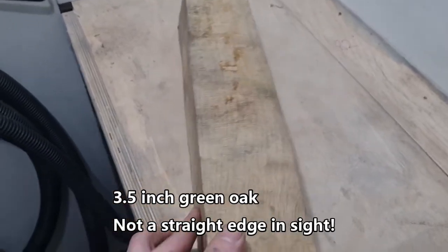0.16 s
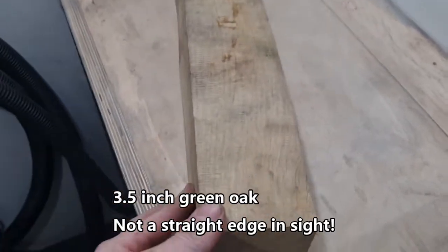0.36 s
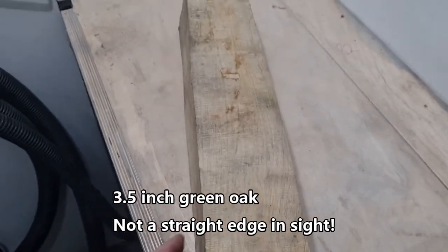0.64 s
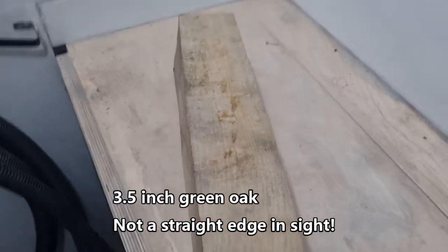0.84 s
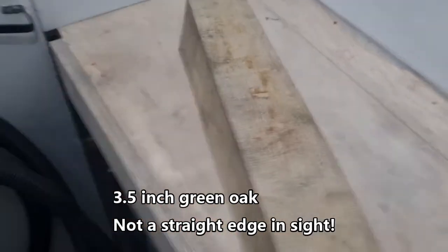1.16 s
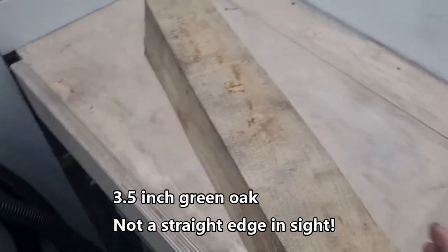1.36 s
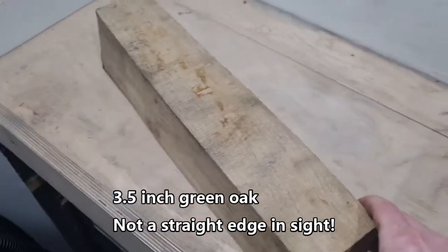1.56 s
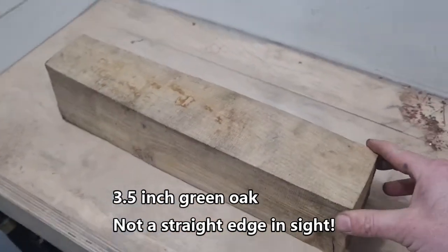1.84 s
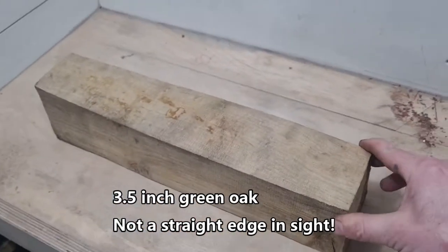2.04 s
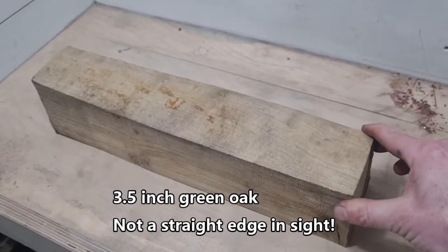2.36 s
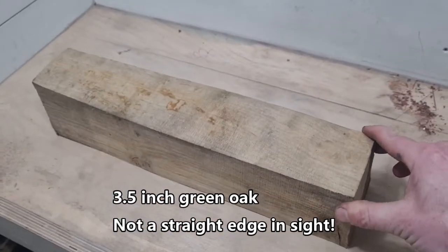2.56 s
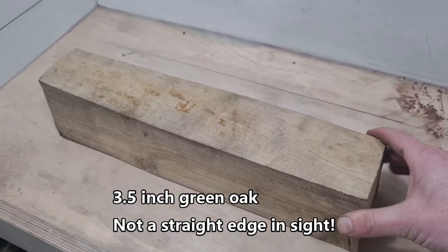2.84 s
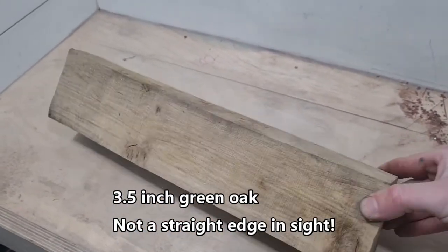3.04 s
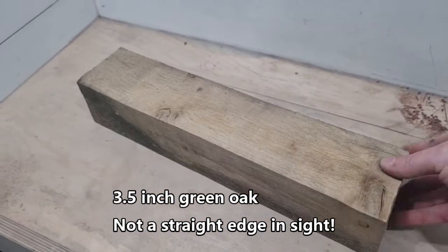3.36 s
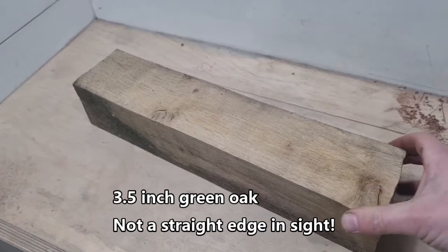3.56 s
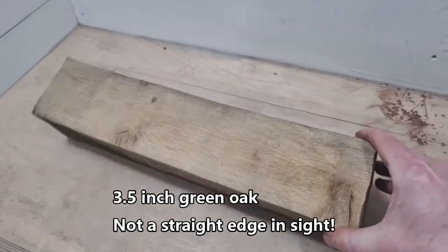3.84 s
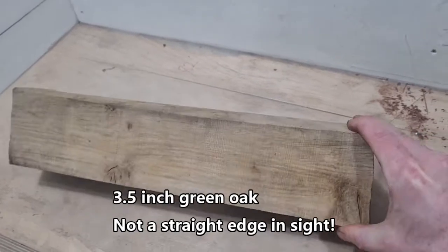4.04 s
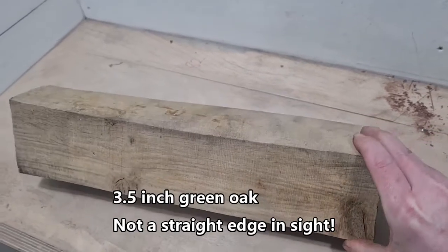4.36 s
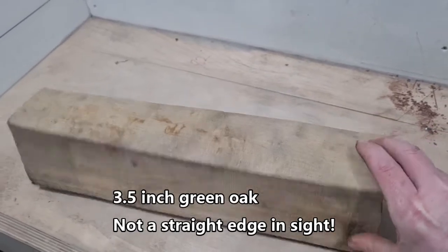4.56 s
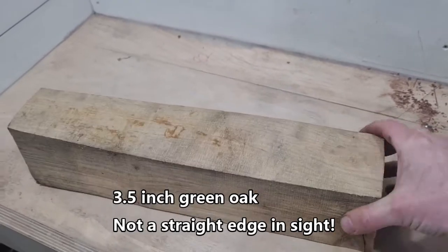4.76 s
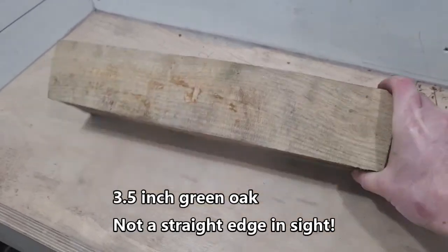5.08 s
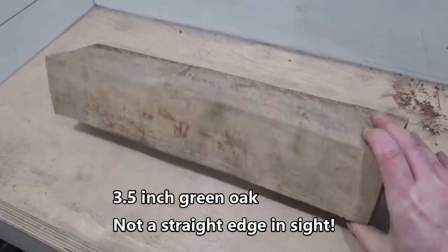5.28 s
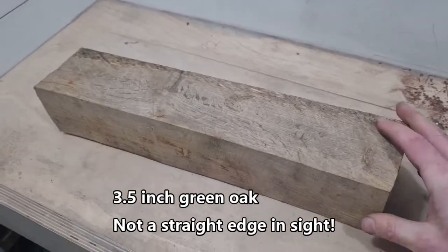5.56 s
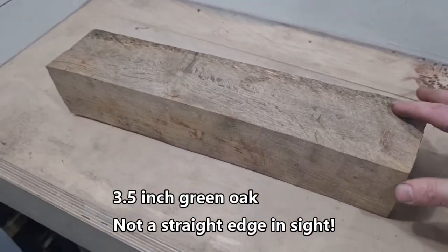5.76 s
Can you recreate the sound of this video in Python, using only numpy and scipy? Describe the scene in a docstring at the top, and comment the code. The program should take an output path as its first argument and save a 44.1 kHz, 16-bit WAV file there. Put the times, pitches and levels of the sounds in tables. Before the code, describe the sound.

A heavy, uneven oak block is handled on a plywood bench, heard close in stereo in a small workshop with low rumble and short reverberation. It opens with a dull, boomy thump and a much softer bump around 0.3 s. Near 0.9 s fingers make two tiny crisp ticks and a softer brush. A short rough slide rasps from 1.5 to 1.8 s. From 2.05 to 2.6 s the block rocks corner to corner in a quick clatter of hollow knocks, loud from 2.18 s. A juddering skid and duller knock come near 2.9 s, then a hard, booming slap at 3.27 s. A faint rub passes around 3.8 s. The strongest, sharpest drop lands at 4.55 s, followed by lesser knocks at 4.62 and 4.78 s. Dry, slightly singing scraping follows until about 5.1 s, then a solid double thump at 5.33 and 5.38 s fades into quiet.

```python
"""Oak block on a plywood workbench

A heavy block is slid, rocked and turned over by hand; its warped faces knock from corner to corner.
Each blow rings bench and block modes over a boom; slides are noise rubbed through the block's modes.
Short ticks, rough singing tones, room rumble and reverberation; the camera's limiter holds hard blows."""
import sys
import numpy as np
from scipy import signal
from scipy.fft import rfft, irfft, next_fast_len
from scipy.io import wavfile
from scipy.ndimage import uniform_filter1d, minimum_filter1d, map_coordinates

SR = 44100
rng = np.random.default_rng(int(sys.argv[2]) if len(sys.argv) > 2 else 0)


def inscribe(sig):
    """Save sig as 16-bit PCM at rate SR to the path in sys.argv[1].

    A 1-D sig is mono; a 2-D sig holds one channel per row.
    Samples are clipped to [-1, 1] before scaling.
    """
    pcm = np.round(np.clip(np.atleast_2d(sig).T, -1, 1) * 32767)
    wavfile.write(sys.argv[1], SR, pcm.astype(np.int16))


N = 260631

# Block meets bench: (time [s], landing spot, thud [dB], thud tilt [dB/octave], boom [dB], clack [dB],
# contact cut-off [Hz], favoured block resonance [Hz])
BLOWS = [(0.001, "flat", -17, -5, -6, -24, 690, 762), (0.317, "far", -25.5, -10, -32.5, -72, 290, 762),
         (0.383, "near", -57, -13, -43.5, -62, 285, 762), (2.05, "far", -14.5, 1, -15, -21.5, 430, 1558),
         (2.176, "near", -2.5, 0, -10, -14.5, 2300, 1310), (2.298, "far", -5, 0, -12, -23, 1600, 1390),
         (2.331, "near", -19, -3, -28.5, -36, 300, 762), (2.399, "near", -5, 2.5, -11, -16.5, 2222, 1277),
         (2.508, "far", -4, 1.5, -12.5, -20, 1600, 762), (2.539, "near", -11.5, -6, -24, -34.5, 300, 762),
         (2.597, "near", -3, 0, -9.5, -17, 2035, 762), (2.883, "far", -14, -3, -28.5, -31.5, 627, 762),
         (3.116, "flat", -31.5, -7.5, -21.5, -33.5, 1989, 1005),
         (3.182, "flat", -40, -3.5, -33, -48, 1800, 1551), (3.263, "flat", -31, 1, -37.5, -20, 1946, 1575),
         (3.272, "flat", -17, 4.5, 0, -6.5, 2593, 1344), (3.278, "flat", -1.5, 1, -23, -12, 1200, 1565),
         (3.29, "flat", -9.5, 1, -23, -22, 3000, 1607), (4.553, "flat", -3.5, 3, 2, -1.5, 2700, 762),
         (4.62, "far", -9.5, -3, -9.5, -26, 2255, 1675), (4.779, "near", -14, 0.5, -14, -19.5, 1400, 1020),
         (5.328, "flat", -5.5, 4, -4.5, -11, 2600, 1930), (5.377, "flat", -8.5, -2.5, -5.5, -15, 1750, 762)]
# Landing spots, in the order of the bench level columns: near corner, far corner, flat face
SPOTS = ["near", "far", "flat"]
# Plywood top modes: (frequency [Hz], t60 [s], level if hit by near corner, far corner, flat face [dB])
BENCH_MODES = [(97, 0.26, -7.5, -8.5, -7), (150.6, 0.21, -13, -14.5, -11.5), (171.3, 0.14, -4.5, -9, -5.5),
               (215, 0.14, -0.5, -5.5, 1), (269.5, 0.092, -9.5, 2, -6), (332, 0.12, -8, -10.5, 1),
               (370.1, 0.1, -5, -9.5, -3.5), (435, 0.079, -12, -5, -5.5), (513.3, 0.11, -15.5, -10.5, -5),
               (604, 0.1, -18, -10.5, -4), (672, 0.03, -27, -12.5, -14)]
# Oak block modes, damped by hand and bench: (frequency [Hz], level [dB], t60 [s])
BLOCK_MODES = [(762, 0, .11), (1005, -4, .08), (1065, -6, .08), (1180, -11, .07), (1300, -3, .08),
               (1440, -15, .08), (1565, -3, .11), (1675, -6, .11), (1767, -11, .09), (1850, -12, .09),
               (1930, -10, .09), (2050, -13, .09), (2250, -16, .09), (2430, -15, .08), (2900, -18, .09),
               (3080, -16, .085), (3300, -20, .07), (3480, -19, .06)]
# Dense ringing of block and bench: (frequency [Hz], density [dB per Hz])
CLACK_SPECTRUM = [(60, -48), (200, -2.5), (450, -6), (800, -5.5), (900, -12), (1100, -8.5), (1750, -16),
                  (2100, -13), (2650, -20.5), (3100, -14.5), (3550, -19.5), (4100, -23.5), (5400, -25.5),
                  (6500, -42.5), (15000, -64)]
# Decay of the dense ringing: (frequency [Hz], t60 [s])
CLACK_DAMPING = [(200, .14), (700, .11), (2000, .095), (3500, .075), (6000, .07), (14000, .06)]
# Pushes, or skids on an edge before a fall: (start [s], speeding up [s], slowing down [s], rasp [dB],
# judder [dB], hiss [dB], judder pitch [Hz])
SLIDES = [(-0.08, 0.16, 0.06, -43, -39.5, -51, 180), (1.497, 0.1, 0.19, -31, -30, -40.5, 180),
          (2.872, 0.12, 0.04, -26.5, -22, -45, 138), (3.246, 0.025, 0.011, -31, -30, -57, 180),
          (3.755, 0.12, 0.12, -40, -36, -69, 190), (4.508, 0.04, 0.012, -38, -34, -56, 180),
          (4.82, 0.2, 0.12, -32, -30, -46, 215), (5.2, 0.14, 0.06, -49, -37, -56, 180),
          (3.0, 0.05, 0.3, -49, -43, -70, 180), (4.738, 0.04, 0.07, -48, -40, -61, 180)]
# The sliding edge drags harder for a moment: (time [s], rasp [dB], half length [s])
SNAGS = [(1.505, -43, 0.008), (2.96, -34, 0.008), (4.546, -24, 0.004), (5.088, -35, 0.014),
         (5.322, -28, 0.007)]
# Rubbed sawn wood: (frequency [Hz], density [dB per Hz])
RASP_SPECTRUM = [(200, -15.5), (400, -2), (520, -6.5), (760, -5.5), (900, -7.5), (1080, -6), (1500, -4.5),
                 (1700, -4.5), (2000, -10), (2600, -9), (3100, -8.5), (3500, -18), (4000, -14.5),
                 (6000, -30.5), (12000, -53)]
# Fibres and grit: (frequency [Hz], density [dB per Hz])
HISS_SPECTRUM = [(2500, -32), (4200, -10.5), (5500, -4.5), (6500, -8), (7500, -14.5), (9000, -13),
                 (12000, -19), (15000, -23.5)]
# Shaken bench top: (frequency [Hz], density [dB per Hz])
JUDDER_SPECTRUM = [(40, -33), (75, 6), (100, 6.5), (135, 0), (210, -1.5), (330, -3.5), (500, -19),
                   (900, -41)]
# Hand shifts its grip: (time [s], body [dB], hiss [dB], attack [s])
TICKS = [(0.877, -39, -57, 0.004), (0.919, -39, -48, 0.004), (0.966, -46, -56, 0.02)]
# Body of a tick: (frequency [Hz], density [dB per Hz])
TICK_SPECTRUM = [(300, -7), (800, -2.5), (1200, 0.5), (1900, -6.5), (2600, -10.5), (3050, -2.5),
                 (3500, -12), (8000, -34)]
# Block on one edge sings at one resonance: (start [s], rise [s], fall [s], level [dB], frequency [Hz])
SINGS = [(1.51, 0.1, 0.16, -41, 1290), (2.92, 0.07, 0.04, -35, 1050), (3.0, 0.24, 0.02, -55, 1570),
         (3.79, 0.11, 0.07, -46, 1280), (4.508, 0.025, 0.04, -46, 1680), (4.87, 0.2, 0.07, -40, 1680),
         (5.2, 0.11, 0.03, -58, 1675)]
# Quiet workshop: (frequency [Hz], density [dB per Hz])
AIR_SPECTRUM = [(20, 2), (40, -1), (65, 4), (90, 0), (130, -17), (250, -12.5), (400, -19), (750, -21),
                (1500, -32), (3000, -42), (6000, -48), (15000, -52)]
# Room decay: (frequency [Hz], t60 [s])
ROOM_DECAY = [(70, .55), (250, .3), (1000, .17), (3000, .14), (12000, .14)]
# Left-right likeness: (frequency [Hz], correlation [-1 to 1])
STEREO_LIKENESS = [(100, 0.92), (180, 0.75), (310, 1), (540, 0.038), (940, 0.25), (1630, 0.27),
                   (3000, 0.0058), (4500, 0.55), (12000, 0.45)]
# Phase scatter at each microphone: (frequency [Hz], scale [rad])
PORT_SKEW = [(700, 0), (2500, 1)]

BOOM_HZ, BOOM_T60_S = 72, 0.35
BOOM_SHARP_HZ, BOOM_RELAX_S = 6, 0.018  # top is stiffer while the block presses into it
CLACK_RISE_S = 0.0025  # soft plywood gives before the block rings
GRIT_DB, GRIT_DB_PER_CLACK_DB = -33.5, 1.45  # crushed fibres at 0 dB clack, and their growth
FAVOUR_DB, FAVOUR_OCTAVES = 5, 0.12  # lift of modes by the spot hit, and its selectivity
RASP_POWER, HISS_POWER, JUDDER_POWER = 1.7, 1.8, 0.9  # exponents of sliding speed
JUDDER_FADE_DB_PER_S = 14.5  # judder is strongest as the block breaks loose
JUDDER_WANDER = 0.13  # scale of random log-pitch deviation
GRAIN_DB, RIDGE_DB, SWELL_DB = 3, 1.8, 1  # grip: single fibres, saw ridges, hand pressure
DRY_RASP_DB = -4  # rasp straight from the contact, relative to that ringing in the block
CREEP = 0.35  # smoothing window as a share of a push
TICK_T60_S = 0.06
SING_WIDTH_HZ = 90  # of each of two cascaded peaks
RIPPLE_HZ = 350  # spacing of the random phase knots
TOP_HZ = 15760


def amp(db):
    """Decibels to gain."""
    return 10 ** (np.asarray(db) / 20)


def unit(x):
    """x at rms 1."""
    return x / np.sqrt(np.mean(x ** 2) + 1e-20)


def along(points, hz):
    """(Hz, value) points interpolated on a log frequency axis."""
    f, v = np.transpose(points)
    return np.interp(np.log(hz + 1), np.log(f + 1), v)


def filtered(x, response):
    """x times a response of frequency."""
    size = x.shape[-1]
    padded = next_fast_len(size + 8192)
    spectrum = rfft(x, padded) * response(np.fft.rfftfreq(padded, 1 / SR))
    return irfft(spectrum, padded)[..., :size]


def wobble(knots_per_s):
    """Smooth random curve through normally distributed knots."""
    knots = rng.standard_normal(int(N * knots_per_s / SR) + 4)
    return map_coordinates(knots, [np.arange(N) * knots_per_s / SR])


def half_angle(hz):
    """Half the stereo phase angle [rad] whose cosine is the left-right likeness."""
    return np.arccos(np.clip(along(STEREO_LIKENESS, hz), -1, 1)) / 2


def noise(spectrum, size):
    """Coloured stereo noise of rms 1; mid and side shares set the likeness by frequency."""
    def shares(hz):
        return amp(along(spectrum, hz)) * [np.cos(half_angle(hz)), np.sin(half_angle(hz))]
    mid, side = filtered(rng.standard_normal((2, size)), shares)
    return unit(np.array([mid + side, mid - side]))


def dying(x, t60s):
    """Each frequency of x decays at its own rate."""
    hz, t, z = signal.stft(x, SR, nperseg=256)
    decay = amp(-60 * t / along(t60s, hz)[:, None])
    return signal.istft(z * decay, SR, nperseg=256)[1][:, :x.shape[-1]]


def ring(hz, db, t60, t, scatter_db, detune):
    """Struck modes as decaying sines, phase-skewed between the microphones."""
    chance = rng.standard_normal((len(hz), 3))
    hz = hz * np.exp(detune * chance[:, 2:])  # block and top load each other differently at every spot
    polarity = (-1) ** np.arange(len(hz))[:, None]
    gain = amp(db + scatter_db * chance[:, :1] - 60 * t / t60) * polarity
    skew = half_angle(hz) * np.sign(chance[:, 1:2])
    pair = np.array([np.sum(gain * np.sin(2 * np.pi * hz * t + ear * skew), 0) for ear in (1, -1)])
    return pair / np.linalg.norm(amp(db))


def add(track, s, sound):
    """Mix a sound into the track at time s."""
    start = round(s * SR)
    sound = sound[:, max(-start, 0):N - start]
    first = max(start, 0)
    track[:, first:first + sound.shape[1]] += sound


def workshop(air_db=-57, hum_db=-73, hum_hz=260.0):
    """Low room rumble as coloured noise, with a faint hum of wavering level."""
    hum_gain = amp(hum_db + 2 * wobble(1.0))
    hum = hum_gain * np.sin(2 * np.pi * hum_hz * np.arange(N) / SR)
    return amp(air_db + wobble(1.3)) * noise(AIR_SPECTRUM, N) + hum


def stroke(start_s, speed_up_s, slow_down_s):
    """Speed of one push, 0-1: the block creeps off, gathers speed and slows to rest."""
    now = np.arange(N) / SR - start_s
    knots = np.cumsum([0, speed_up_s, slow_down_s])
    speed = np.sin(np.pi / 2 * np.interp(now, knots, [0, 1, 0]))
    # abs removes tiny negative rounding before the speed powers
    return abs(uniform_filter1d(speed, size=int(CREEP * knots[-1] * SR) + 1))


def waver(hz, wander, knots_per_s=45, depth_db=3):
    """Unsteady stick-slip tone of rms 1."""
    turns = np.cumsum(hz * np.exp(wander * wobble(knots_per_s))) / SR
    return unit(amp(depth_db * wobble(2 * knots_per_s)) * np.sin(2 * np.pi * turns))


def block_response(hz):
    """Resonances of the rubbed block; each mode's width follows from its decay."""
    total = 0
    for mode_hz, db, t60 in BLOCK_MODES:
        gain = amp(db - along(RASP_SPECTRUM, mode_hz))  # offsets the colour of the driving noise
        total = total + gain / (1 + 2j * np.pi * (hz - mode_hz) * t60 / np.log(1000))
    return total


def slides(rasp_db=-1, judder_db=-4, chatter_db=-3, hiss_db=1):
    """Sawn fibres catch and slip, exciting the block's modes and shaking the top."""
    now = np.arange(N) / SR
    rasp = sum(amp(db) * np.exp(-((now - s) / half_s) ** 2) for s, db, half_s in SNAGS)
    hiss, judder, chatter = np.zeros((3, N))
    for start_s, up_s, down_s, rub_db, shake_db, fibre_db, shake_hz in SLIDES:
        speed = stroke(start_s, up_s, down_s)
        fade_db = JUDDER_FADE_DB_PER_S * np.clip(now - start_s, 0, 1)
        shaking = amp(shake_db - fade_db) * speed ** JUDDER_POWER
        rasp = rasp + amp(rub_db) * speed ** RASP_POWER
        hiss = hiss + amp(fibre_db) * speed ** HISS_POWER
        judder = judder + shaking
        chatter = chatter + shaking * waver(shake_hz, JUDDER_WANDER)
    pressure = unit(amp(RIDGE_DB * wobble(140) + SWELL_DB * wobble(35)))
    grip = pressure * unit(amp(GRAIN_DB * wobble(900)))
    ringing = unit(filtered(grip * noise(RASP_SPECTRUM, N), block_response))
    direct = amp(DRY_RASP_DB) * grip * noise(RASP_SPECTRUM, N)
    scrape = amp(rasp_db) * rasp * (ringing + direct)
    shake = amp(judder_db) * judder * noise(JUDDER_SPECTRUM, N) + amp(chatter_db) * chatter
    return scrape + shake + amp(hiss_db) * hiss * np.sqrt(grip) * noise(HISS_SPECTRUM, N)


def bench_ring(t, spot, tilt_db, pivot_hz=260):
    """Each landing spot drives its own mix of the top's modes."""
    hz, t60, *levels = np.transpose(BENCH_MODES)[:, :, None]
    db = levels[SPOTS.index(spot)] + tilt_db * np.log2(hz / pivot_hz)
    return ring(hz, db, t60, t, scatter_db=1.5, detune=0.012)


def block_ring(t, favoured_hz):
    """The spot that is hit lifts the block modes near one frequency."""
    hz, db, t60 = np.transpose(BLOCK_MODES)[:, :, None]
    db = db + FAVOUR_DB * np.exp(-(np.log2(hz / favoured_hz) / FAVOUR_OCTAVES) ** 2)
    return ring(hz, db, t60, t, scatter_db=1, detune=0.005)


def boom_flex(t, rise_s=0.00086, settle_s=0.1, settle_db=-12):
    """The whole top flexes under the block's weight, freely until the block settles and damps it."""
    settling = (1 + np.tanh((t - settle_s) / 0.00073)) / 2
    swing_db = -60 * t / BOOM_T60_S + settle_db * settling
    turns = BOOM_HZ * t + BOOM_SHARP_HZ * BOOM_RELAX_S * (1 - np.exp(-t / BOOM_RELAX_S))
    return amp(swing_db) * (1 - np.exp(-t / rise_s)) * np.sin(2 * np.pi * turns)


def knocks(dense_db=-6, crack_db=-6, bite_db=1, block_db=0.5, scuff_db=-14, leak_db=-27, crumble_db=-4,
           thud_rise_s=0.0021, scuff_t60_s=0.052, crack_t60_s=0.11):
    """Each blow flexes the top and rings bench and block; a blunt contact dulls the treble."""
    out, t = np.zeros((2, N)), np.arange(int(.7 * SR)) / SR
    lead = SR // 25  # samples ahead of the landing

    def landed(x):
        return np.pad(x, ((0, 0), (lead, 0)))

    def rise(time_s):
        return 1 - np.exp(-t / time_s)

    # the rough edge scuffs the plywood around the landing
    scuff = amp(scuff_db - 60 * abs(np.arange(lead + len(t)) - lead) / SR / scuff_t60_s)
    # the edge bites in and fibres snap as the pressure peaks, 4 ms into the contact
    bite = amp(-60 * abs(t - .004) / .028)
    crumble = amp(-60 * t / .16) * rise(.005)
    crush = scuff + landed(np.array([bite + amp(crumble_db) * crumble]))
    strike = amp(bite_db) * bite + amp(crack_db - 60 * t / crack_t60_s)
    flex = boom_flex(t)
    for s, spot, thud_db, tilt_db, boom_db, clack_db, contact_hz, block_hz in BLOWS:
        thud = amp(thud_db) * rise(thud_rise_s) * bench_ring(t, spot, tilt_db)
        dense = amp(dense_db) * dying(noise(CLACK_SPECTRUM, len(t)), CLACK_DAMPING)
        modes = amp(block_db) * block_ring(t, block_hz)
        clack = rise(CLACK_RISE_S) * (dense + modes + strike * noise(CLACK_SPECTRUM, len(t)))
        scuffing = scuff * noise(CLACK_SPECTRUM, len(scuff))
        wood = amp(clack_db) * (scuffing + landed(clack)) + landed(thud)
        blunt = signal.sosfilt(signal.butter(3, contact_hz, fs=SR, output="sos"), wood)
        grit_gain = amp(GRIT_DB + GRIT_DB_PER_CLACK_DB * clack_db)
        grit = grit_gain * crush * noise(HISS_SPECTRUM, len(scuff))
        leak = amp(leak_db) * wood  # a few hard fibres pass the full band
        add(out, s - lead / SR, blunt + leak + grit)
        add(out, s, amp(boom_db) * flex * amp([[-.4], [.4]]))
    return out


def walls(x):
    """Short reverberation of a small cluttered room: decaying noise, 10 ms late."""
    colour = [(50, 6.0), (300, -5.0), (3000, 2.0), (15000, -2.5)]  # (frequency [Hz], density [dB per Hz])
    tail = dying(noise(colour, SR * 2 // 3), ROOM_DECAY)
    tail = np.pad(tail / np.linalg.norm(tail[0]), ((0, 0), (SR // 100, 0)))
    return signal.fftconvolve(x, tail, axes=1)[:, :N]


def ticks():
    """Fingers catch on the sawn wood: two crisp noise bursts, then a softer brush."""
    out, t = np.zeros((2, N)), np.arange(SR // 5) / SR
    for s, body_db, hiss_db, attack_s in TICKS:
        fade = amp(-60 * t / TICK_T60_S) * (1 - np.exp(-t / attack_s))
        body = amp(body_db) * noise(TICK_SPECTRUM, len(t))
        hiss = amp(hiss_db) * noise(HISS_SPECTRUM, len(t))
        add(out, s, fade * (body + hiss))
    return out


def singing():
    """A rubbing edge feeds one resonance of the block: a rough woody tone."""
    out = np.zeros((2, N))
    for start_s, rise_s, fall_s, db, hz in SINGS:
        peak = np.concatenate(signal.iirpeak(hz, hz / SING_WIDTH_HZ, SR))
        tone = unit(signal.sosfilt([peak, peak], noise(RASP_SPECTRUM, N)))
        out += amp(db) * stroke(start_s, rise_s, fall_s) * tone
    return out


def ports(x):
    """Reflections off the top reach two spaced microphones by different paths: treble out of step."""
    knots = rng.standard_normal(SR // RIPPLE_HZ)

    def turn(hz):
        skew = along(PORT_SKEW, hz) * map_coordinates(knots, [hz / RIPPLE_HZ])
        return np.exp(1j * np.outer([1, -1], skew))
    return filtered(x, turn)


def scene(room_db=-20):
    """Block and bench heard from close by, in a small workshop."""
    wood = slides() + knocks() + ticks() + singing()
    return ports(wood + amp(room_db) * walls(wood) + workshop())


def record(dry, ceiling=0.84, low_cut_hz=38):
    """Microphone low cut, fast look-ahead limiter, then the camera's band limit."""
    x = signal.sosfilt(signal.butter(2, low_cut_hz, "high", fs=SR, output="sos"), dry)
    need = np.minimum(1, ceiling / (abs(x).max(0) + 1e-9))
    gain = uniform_filter1d(minimum_filter1d(need, size=67), size=67)  # 1.5 ms windows
    return filtered(x * gain, lambda hz: hz < TOP_HZ)


dry = scene()
out = record(dry)
inscribe(out)
```